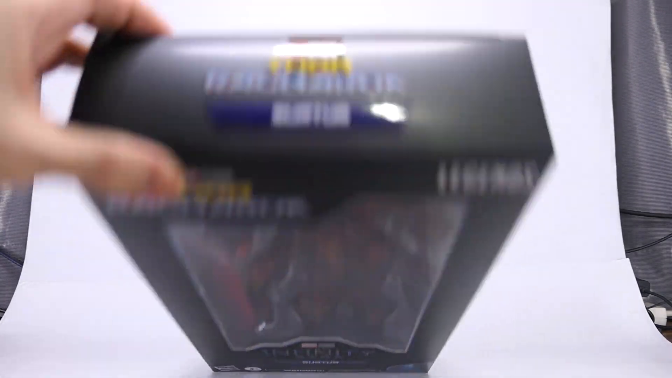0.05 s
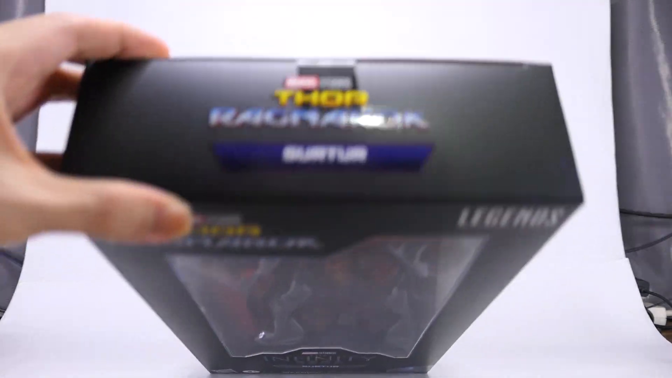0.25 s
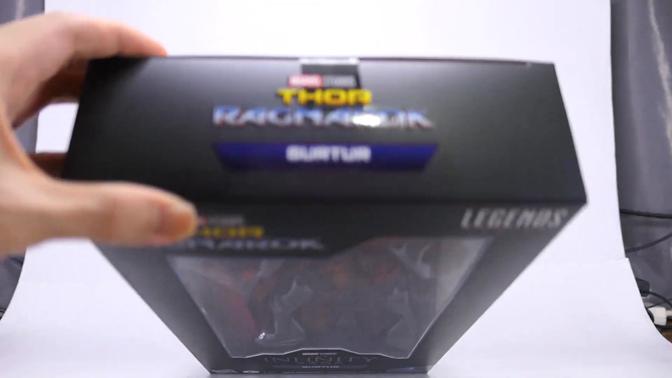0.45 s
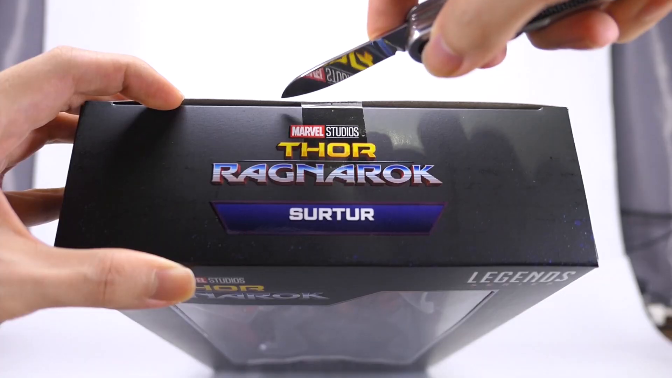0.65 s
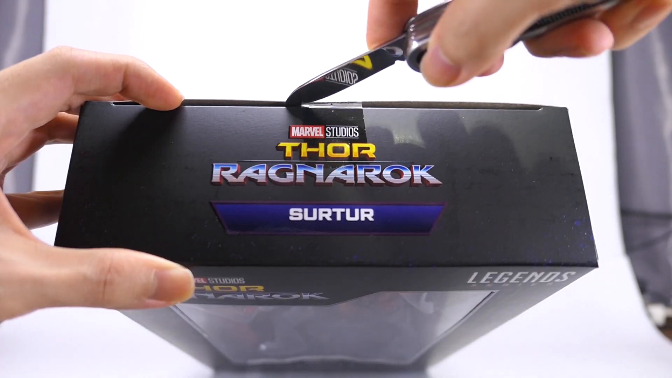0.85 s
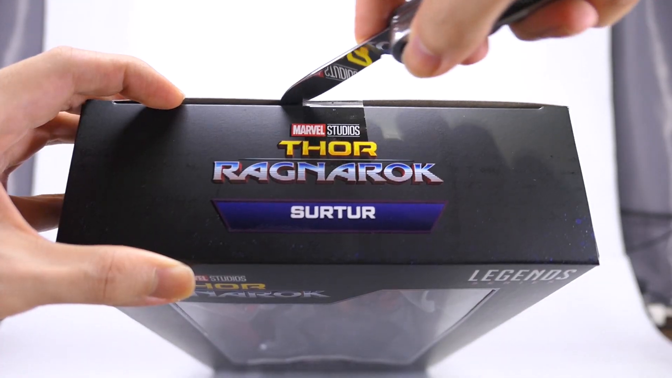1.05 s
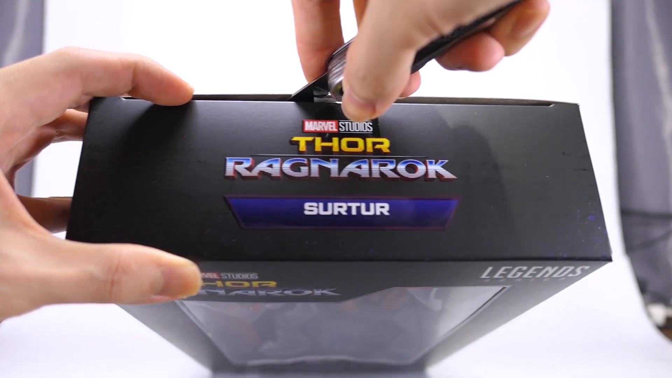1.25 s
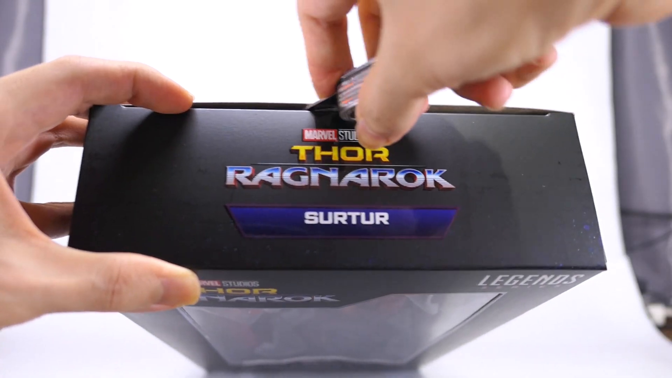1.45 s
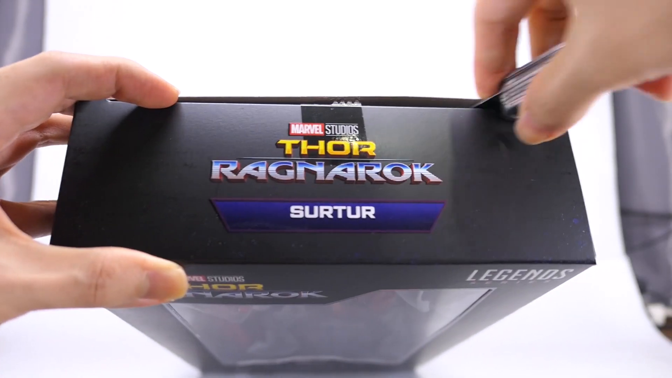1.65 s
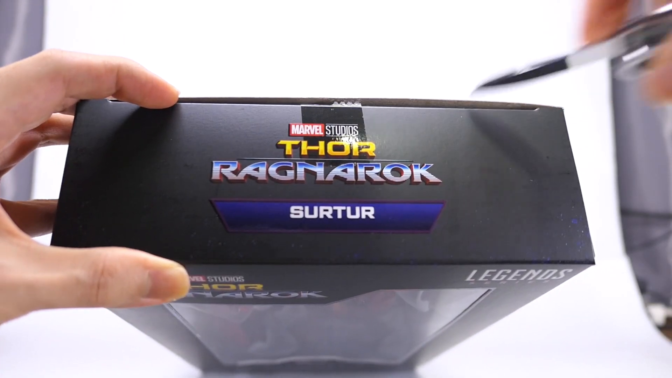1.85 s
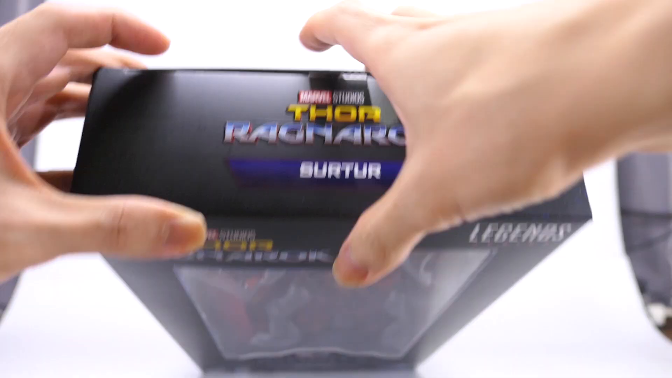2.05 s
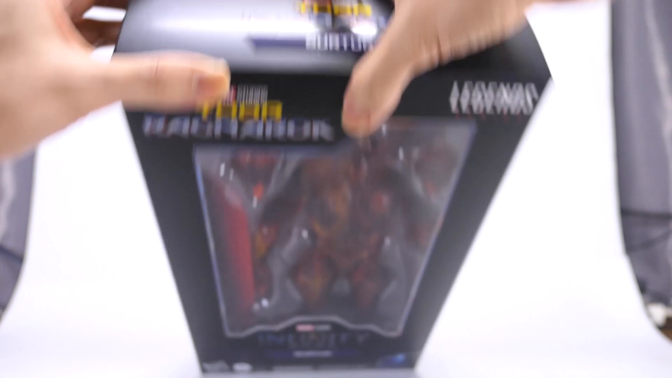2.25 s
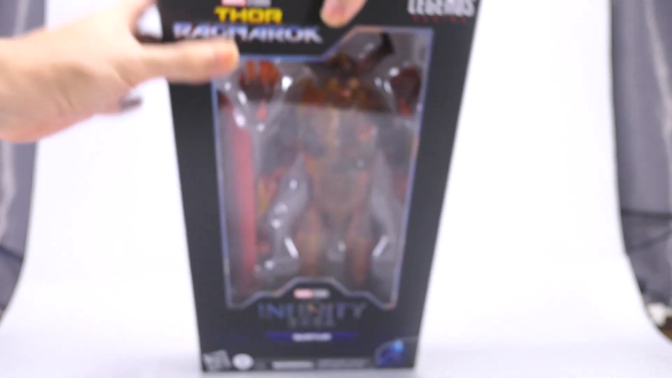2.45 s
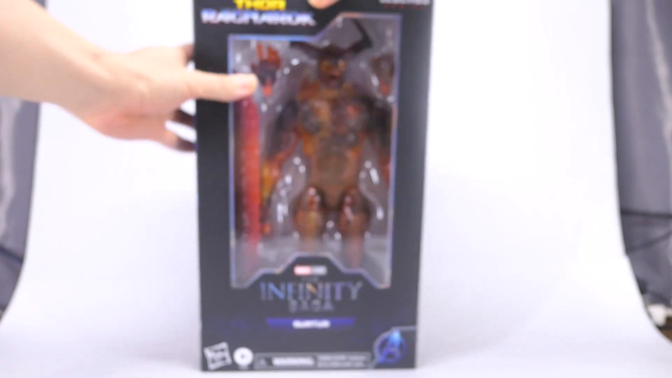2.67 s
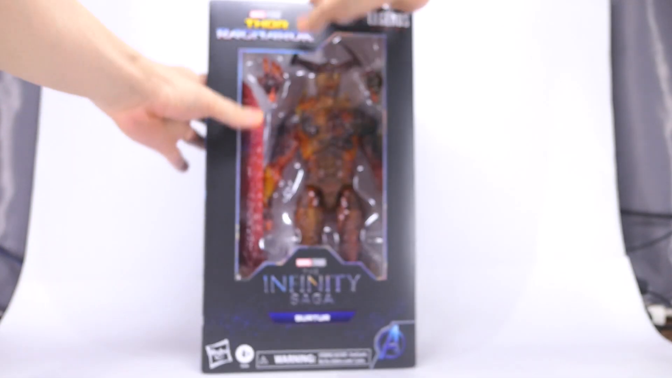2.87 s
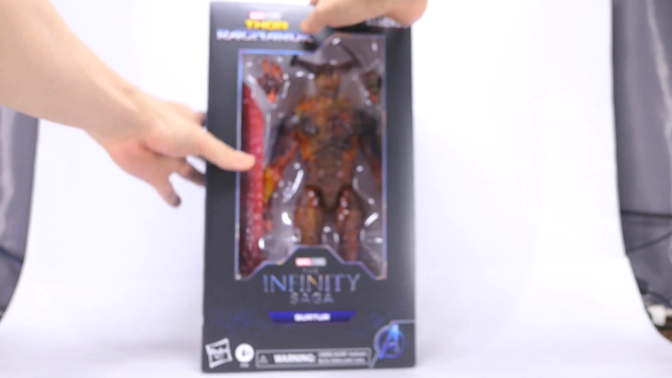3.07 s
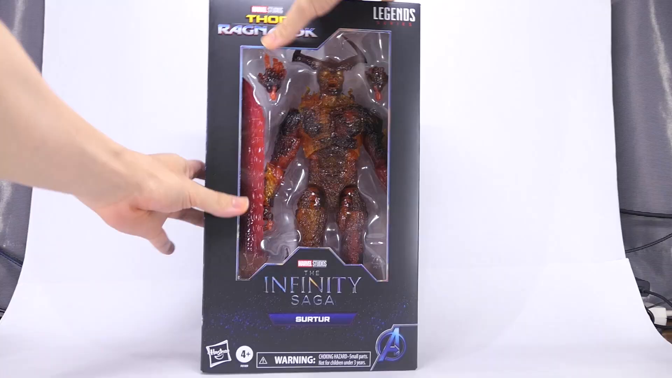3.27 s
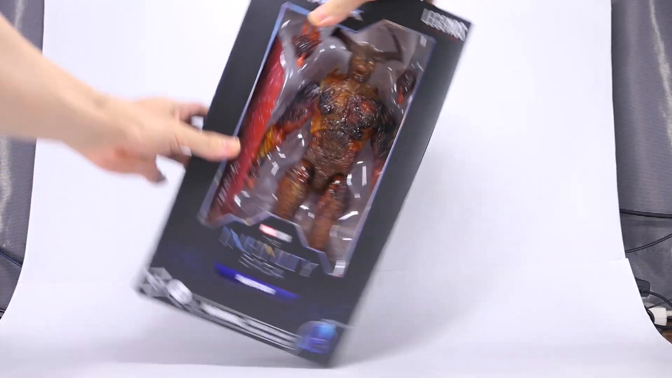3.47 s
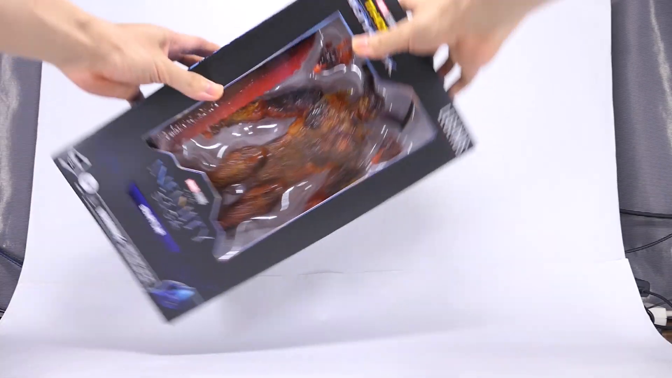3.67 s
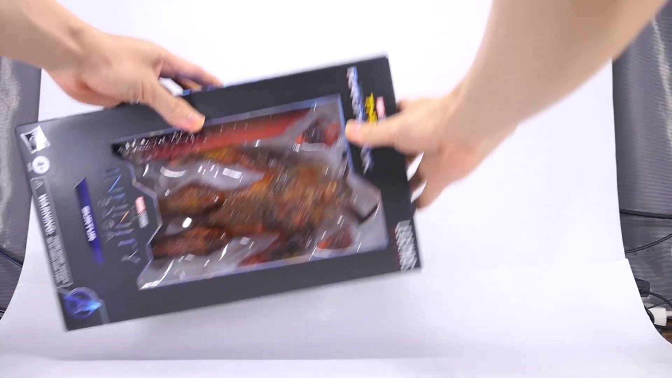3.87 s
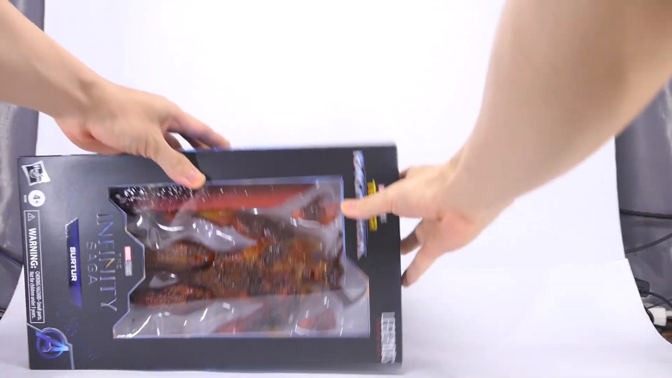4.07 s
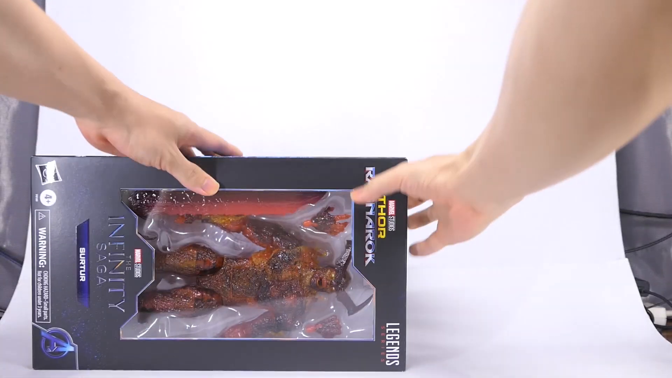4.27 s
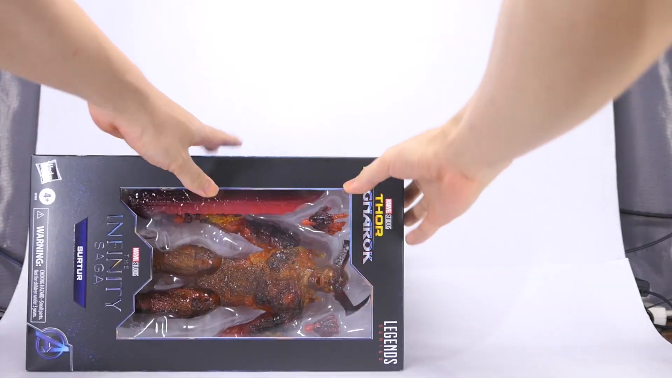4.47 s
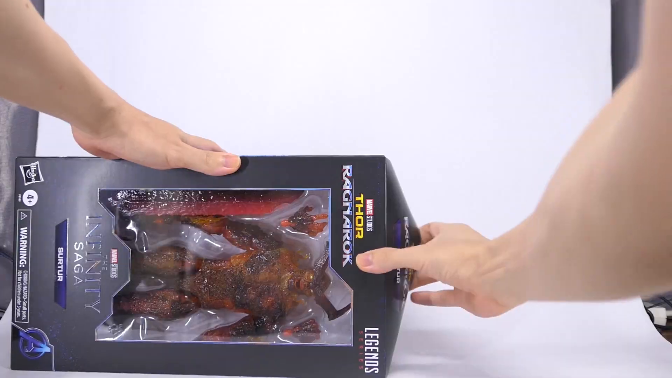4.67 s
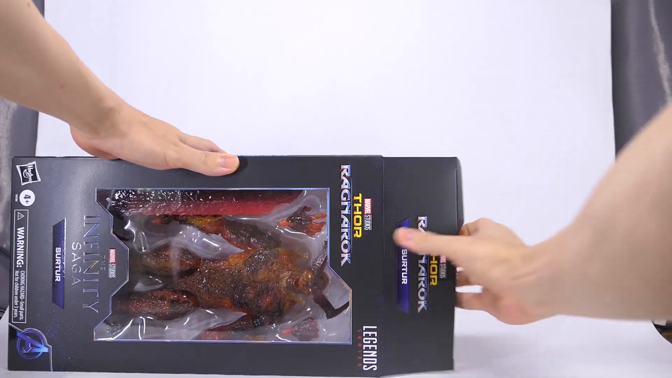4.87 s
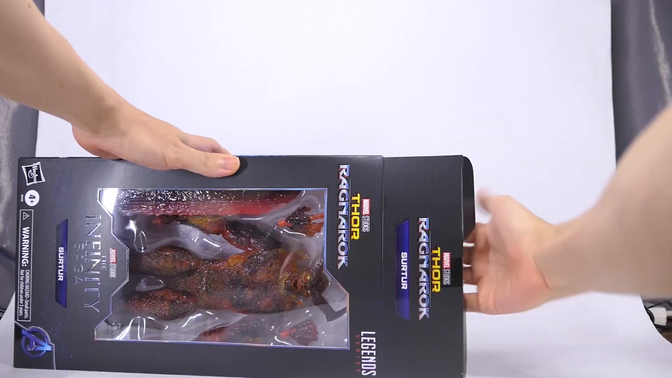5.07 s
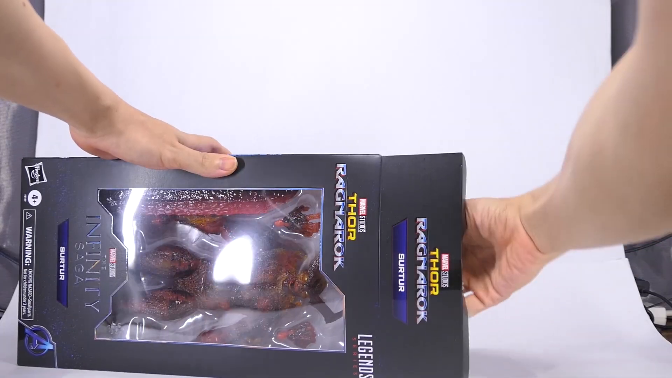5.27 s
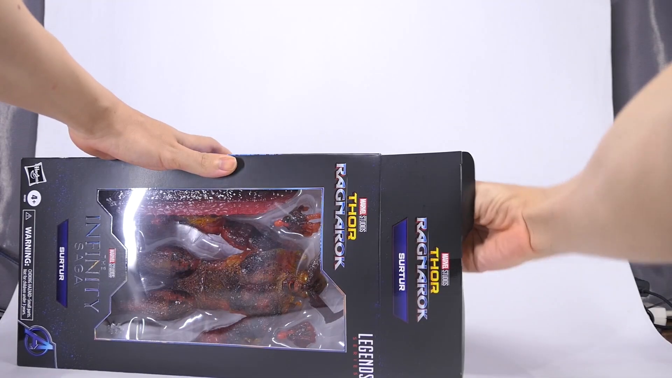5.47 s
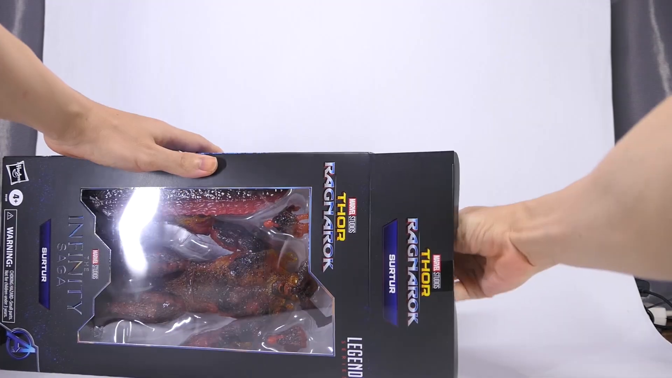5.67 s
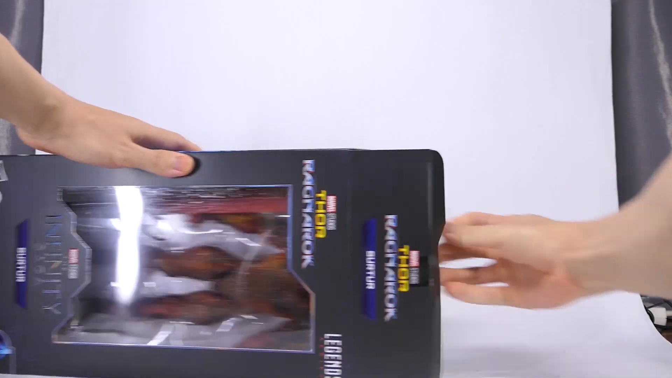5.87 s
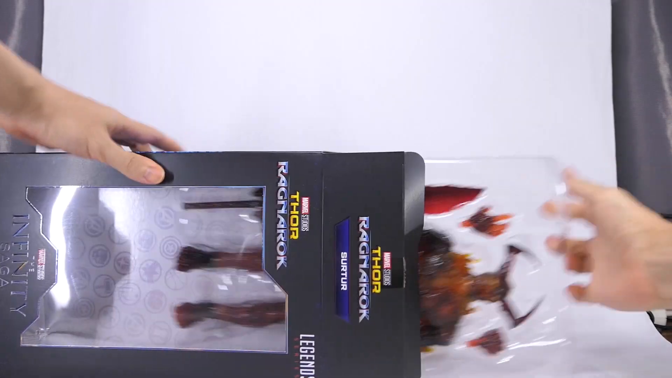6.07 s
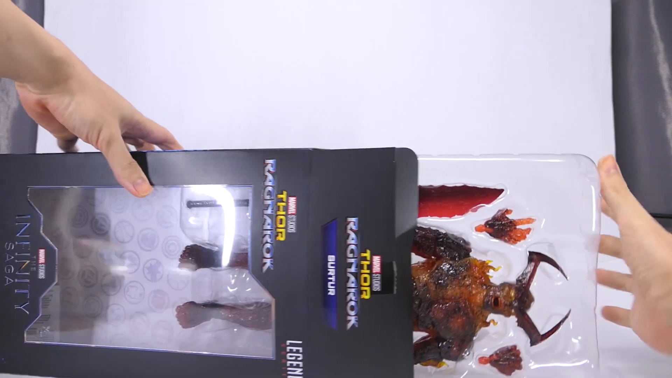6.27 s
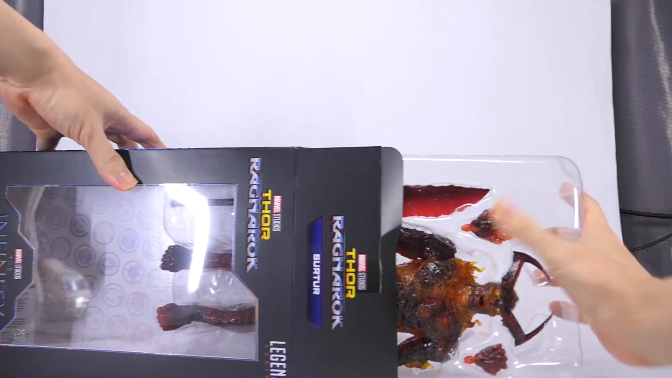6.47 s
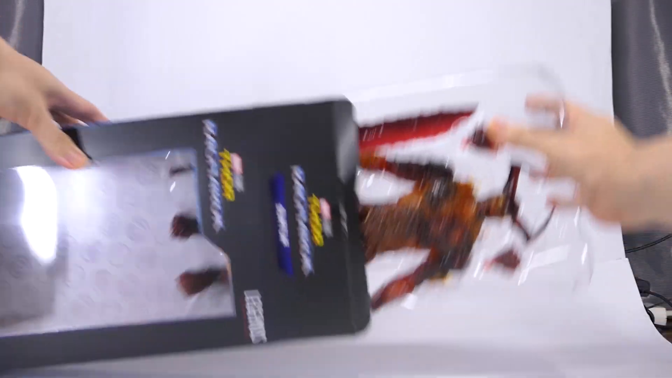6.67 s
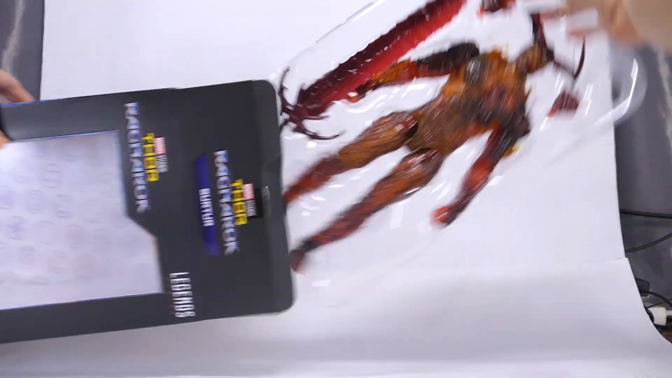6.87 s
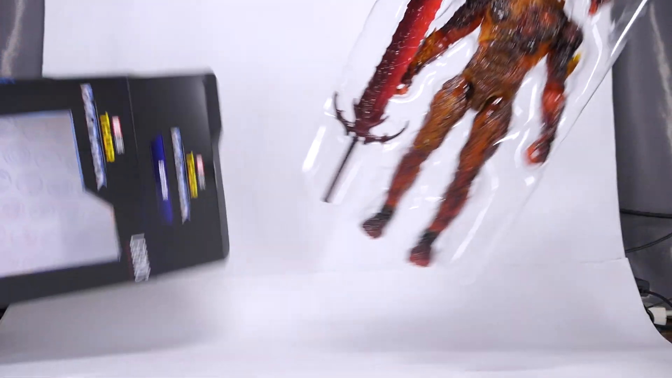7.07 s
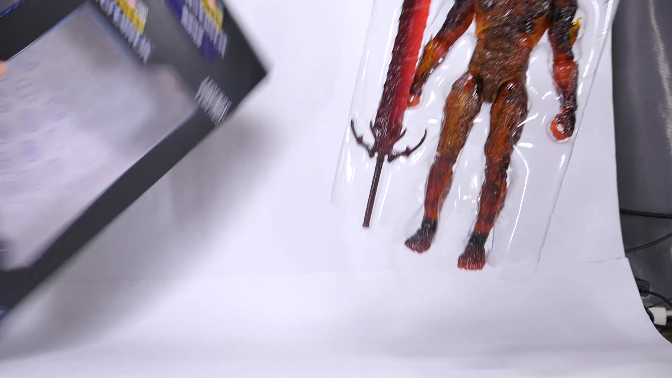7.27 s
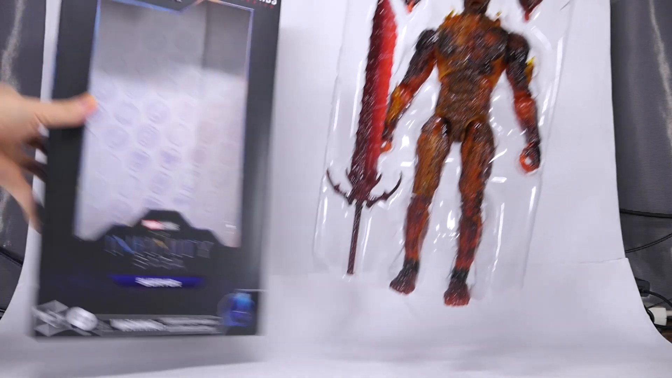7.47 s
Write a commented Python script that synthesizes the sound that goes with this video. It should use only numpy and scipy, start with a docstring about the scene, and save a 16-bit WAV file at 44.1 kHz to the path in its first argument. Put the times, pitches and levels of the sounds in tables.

```python
"""On a table in a quiet room, hands open a cardboard box close to a stereo camera microphone:
a knife cuts the tape, the box is tipped and laid down, the flap opens and a thin plastic tray slides out,
popping and crackling. Each contact is a burst of tiny slips that rings the hollow box, its panels and the
stiff plastic; the blade's grit rings a few narrow bands. A short room tail and a faint hush lie behind."""
import sys
import numpy as np
from scipy import signal
from scipy.fft import rfft, irfft
from scipy.io import wavfile
from scipy.ndimage import uniform_filter1d

SR = 44100
rng = np.random.default_rng(int(sys.argv[2]) if len(sys.argv) > 2 else 0)


def dump_mix(stems):
    """Bounce the given channels to the path in sys.argv[1] as a 16-bit WAV at rate SR."""
    frames = np.atleast_2d(stems).T  # one column per channel
    limited = np.clip(frames, -1, 1)  # hard clip at full scale
    pcm = np.round(limited * 32767).astype(np.int16)
    wavfile.write(sys.argv[1], SR, pcm)


N = 331808  # length in samples

# Knocks and pops. Each row: main blow in seconds, hollow thump in dB, panel knock in dB, crack in dB,
# treble over crack in dB, favoured hollow, panel and crack pitches in Hz, fall in ms.
HITS = [(0.072, -42.5, -51, -69, -5, 298, 910, 1770, 4.4),
        (0.1182, -57, -44.5, -47, -34, 280, 860, 2150, 3),
        (0.1328, -60, -42, -48, -31, 260, 800, 1400, 3.9),
        (0.2462, -46.6, -44, -50, -28, 323, 655, 1490, 3.4),
        (0.7348, -51.5, -59, -60, -13, 262, 970, 1880, 4.7),
        (0.8994, -51, -49.9, -58, -10, 330, 635, 2040, 4.9),
        (1.224, -33, -44, -45, -1.8, 360, 600, 2330, 3.6),
        (1.403, -30.5, -41, -40.5, -1.5, 309, 690, 1890, 4.8),
        (1.4174, -25, -34.5, -43, -11, 326, 794, 1770, 3.2),
        (1.4933, -32.5, -58, -62, -8, 298, 590, 2160, 2.9),
        (1.5731, -23.4, -37, -54, 11, 325, 640, 1620, 3), (1.5918, -29, -42, -47, 8, 284, 740, 2210, 4.7),
        (1.6017, -30, -39, -36.7, -9, 315, 940, 2210, 4.2),
        (2.3937, -34, -44.5, -54, -6, 304, 940, 1330, 3.7),
        (2.4774, -46, -59.8, -57, 0, 300, 740, 1680, 4.0),
        (2.5085, -41, -52, -59, -9.4, 340, 930, 1810, 4.2),
        (2.6068, -43, -48.5, -53, -21, 344, 1020, 1660, 3.4),
        (2.7359, -52, -48.8, -52, -10, 320, 637, 1760, 5.3),
        (2.7744, -46.6, -44, -62, -10.7, 350, 775, 1440, 4.3),
        (2.8467, -45, -52, -43, -29, 320, 680, 1920, 4.8),
        (2.8541, -39.8, -49, -49, 3, 322, 560, 1890, 5.7),
        (2.9185, -40, -46, -44, -21, 350, 590, 1300, 3.8),
        (2.9356, -36, -27.5, -35.5, 10, 325, 560, 1560, 2.37),
        (3.0194, -43, -40.5, -56, -13, 330, 550, 1390, 4.8),
        (3.3471, -37, -34.5, -53, -5, 360, 550, 1610, 3.2),
        (3.3638, -28, -25, -35.5, -11, 334, 630, 1610, 3.1),
        (3.4037, -36, -36, -44, -9, 316, 590, 1590, 4.8),
        (3.4563, -29.5, -36, -51, -3, 283, 530, 1310, 5.2),
        (3.579, -39.5, -42.5, -57, -9, 380, 567, 1640, 2.83),
        (3.6417, -50, -41.5, -64, -19, 340, 690, 1330, 4.4),
        (3.7842, -44, -35.5, -46, -13, 320, 690, 1360, 5.1),
        (3.8267, -54, -40.5, -50.5, -13, 250, 630, 1620, 4.2),
        (4.0105, -33, -26.5, -37.5, -11, 317, 637, 1630, 2.93),
        (4.1165, -25.7, -15.5, -34, -16, 335, 638, 1330, 4.43),
        (4.1245, -25, -23, -36, -5, 310, 686, 1810, 2.9),
        (4.2041, -17.7, -24.5, -25, -9.5, 352, 640, 1490, 3.94),
        (4.2247, -25, -32, -50.4, 1, 330, 540, 1560, 3.4),
        (4.2844, -39.6, -37, -39, -21, 322, 606, 1930, 3.7),
        (4.356, -44, -43.5, -63, -16.8, 293, 570, 1750, 4.0),
        (4.3766, -38.5, -37.5, -49, -30, 307, 690, 1900, 3.6),
        (4.4886, -42, -42, -55, 0, 260, 774, 1300, 2.5), (4.579, -45.4, -38, -57, -2, 308, 530, 1860, 3.4),
        (4.606, -40.5, -43.0, -58.3, -4, 340, 560, 1570, 4.5),
        (4.718, -15, -20, -33.5, -7, 317, 540, 1630, 4.5),
        (4.7403, -40, -26, -22.5, -30, 288, 550, 1660, 3.5),
        (4.8662, -12.5, -17.5, -15, -22, 297, 655, 2120, 6.5),
        (4.9053, -32.5, -38.9, -38.5, -8.5, 290, 600, 1690, 3.9),
        (5.1169, -29, -24.5, -30, -12, 287, 530, 1740, 2.65),
        (5.1686, -35, -32, -34, -12, 288, 800, 1700, 3.5),
        (5.2315, -49, -31, -28.5, -16, 320, 690, 2330, 3.9),
        (5.2526, -24.5, -26.5, -36, -23, 320, 736, 1900, 4.0),
        (5.3291, -41, -32.5, -41, -12.8, 250, 620, 2100, 6.6),
        (5.6375, -27.1, -23.5, -24.5, -16, 292, 640, 1740, 5.7),
        (5.7005, -31.5, -40, -52, -10.7, 267, 600, 1720, 3.5),
        (5.754, -25.5, -17.4, -14.5, -21, 336, 710, 1520, 4.38),
        (5.8352, -25, -13, -12, -6.5, 336, 866, 1660, 1.84),
        (5.9121, -25, -29.5, -32.5, -13, 263, 666, 1620, 2.64),
        (5.9831, -29.4, -17, -15, -3, 290, 745, 1670, 2.84),
        (6.0356, -48, -26.5, -23, -32, 330, 820, 1700, 4.0),
        (6.0752, -21.5, -23.5, -23, -32, 350, 570, 1410, 3.7),
        (6.1, -34, -25, -28, -9.4, 300, 1000, 1570, 3.4), (6.1179, -37, -29, -33, -33, 280, 784, 1640, 4.6),
        (6.1423, -27.5, -20, -24.5, -11.5, 350, 920, 1550, 4.3),
        (6.1683, -27, -13, -13, -16.5, 290, 1120, 1600, 3.3),
        (6.2453, -40, -41, -40.7, -30, 360, 1110, 1800, 5),
        (6.3043, -56, -46.3, -43, -10, 300, 1050, 1760, 4.4),
        (6.3969, -50, -37.8, -36, -11.5, 360, 930, 2290, 4.9),
        (6.4221, -44.2, -36.5, -52, -8.8, 280, 920, 1340, 6.7),
        (6.5096, -42.4, -37.2, -37, -10, 330, 920, 1420, 3.2),
        (6.5904, -35, -27, -33, 16, 250, 970, 2310, 2.95),
        (6.6314, -35.8, -39, -31.5, 6.5, 328, 775, 1810, 3.9),
        (6.644, -32, -33, -22.1, -3, 293, 1020, 1740, 4.1),
        (6.7074, -41, -35, -37.5, -10, 302, 960, 1610, 4.6),
        (6.7664, -33.3, -31, -39.5, 1, 271, 655, 1730, 2.8),
        (6.8696, -32, -29, -28, -29, 230, 640, 1430, 3.4),
        (6.9155, -27.5, -29, -30.5, 4.5, 278, 570, 2170, 4.2),
        (6.9681, -21, -22.9, -21, -18, 283, 1050, 1830, 5.3),
        (6.9944, -23, -34, -28, -2.5, 360, 640, 1390, 3.6),
        (7.0373, -26.5, -21, -23.5, -11.8, 300, 1170, 1440, 6.4),
        (7.1115, -31, -35.5, -44.2, -14.2, 296, 735, 1380, 4.0),
        (7.1794, -35, -32.5, -37.8, -19, 334, 620, 2320, 3.3),
        (7.1899, -35, -50, -39, 5, 350, 500, 2100, 2.3),
        (7.2454, -60, -48, -42.5, -16, 310, 970, 2240, 3.9),
        (7.2925, -47, -44.5, -48, -1, 285, 670, 1840, 4.3),
        (7.3536, -39, -35.5, -44.5, -24, 287, 1100, 1560, 2.7),
        (7.4089, -51, -40, -44.4, -4, 277, 795, 1600, 3.7),
        (7.4558, -56, -43.5, -49, -6, 280, 930, 1830, 5.7),
        (7.4734, -40.5, -46, -56, -4, 260, 540, 1577, 5)]
# Small bright ticks of nail, blade and film. Each row: main blow in seconds, level in dB.
TICKS = [(0.3162, -54), (0.3605, -53), (0.5696, -48), (1.509, -39.5), (1.9265, -37), (1.9587, -44),
         (2.2677, -43), (2.3229, -34), (2.3413, -37.5), (2.8442, -33.5), (3.926, -46), (6.5404, -45),
         (7.013, -20), (7.3841, -44), (7.424, -34.5)]
# Colour of a tick. Each entry: level of one register against the tick's level in dB.
TICK_COLOUR_DB = (-24, -24, -22, -31, -9)
# Scrapes of blade, flap and tray. Each row: start in seconds, rise, hold and fall in ms (kept to 1-95 ms),
# hollow, panel and rasp levels in dB, treble over rasp in dB.
SCRAPES = [(0.19, 11, 56, 26, -71, -55.5, -55.5, -10.5), (1.141, 69, 45, 88, -42.5, -47.5, -45, -5.5),
           (1.562, 3.4, 44, 21, -32, -44, -48, 5.5), (1.614, 3.4, 70, 62, -54, -57, -48.5, 5),
           (1.84, 29, 68, 10, -65, -61, -52.5, -5), (2.899, 10, 46, 75, -39, -41.5, -51.5, -6),
           (3.359, 5, 22, 15, -58, -39, -40.5, -9.5), (3.41, 9.1, 48, 71, -39.5, -42.5, -49, 0),
           (3.491, 7.5, 75, 8, -67, -58, -60.5, 3), (4.189, 7, 4.3, 19.6, -24.5, -19.5, -31.5, -8),
           (4.66, 78, 5.6, 46, -31.5, -37.5, -35.5, -7.5), (4.801, 38, 27, 15, -33.5, -40, -43.5, -20),
           (4.989, 12.5, 50, 27, -45.5, -46.5, -47.5, -13), (5.13, 7.1, 66, 15, -39.5, -40, -40, -13),
           (5.199, 20, 37, 44, -43, -39.5, -36.5, -16), (5.31, 6.7, 6.8, 14, -39, -42.5, -46, -16),
           (5.36, 89, 18, 13, -38.5, -35.5, -36.5, -14), (5.42, 34, 49.4, 22, -37, -40, -37.5, -10.5),
           (5.574, 21.6, 24, 12, -40, -43, -42, -13), (5.645, 3, 20, 19, -44, -40, -43, -10.5),
           (5.719, 33, 5.7, 3.8, -26.5, -27, -34.5, -23), (5.92, 30, 40, 11, -41, -43, -39, -28),
           (6.05, 22, 110, 59, -37, -29, -35, -26), (6.165, 3.7, 6.6, 22, -37, -26, -31, -20),
           (6.258, 6.7, 7.6, 14, -63, -37.5, -42.5, -26), (6.47, 39, 20, 17, -50, -42, -43.5, -18),
           (6.595, 6, 51, 13, -38.5, -31, -34.5, -4.5), (6.7, 2.8, 15, 22, -61, -36, -49, -15),
           (6.74, 24, 75, 21, -55, -36.5, -47.5, 0), (6.86, 2.8, 41, 10, -38, -33, -38.5, -10),
           (6.912, 1.8, 42, 10, -37, -26.5, -29.5, -0.5), (6.967, 1.4, 33, 26, -28, -26, -31, -10.5),
           (7.022, 2.4, 8, 75, -23.5, -26.5, -30, -5)]
# Knife cuts through the tape. Each row: start in seconds, length in seconds, level in dB.
CUTS = [(1.155, 0.17, -45), (1.602, 0.14, -47), (1.81, 0.084, -56)]
# Resonances of blade and taut tape. Each row: pitch in Hz, width in Hz, relative level in dB.
BLADE_BANDS = [(2530, 220, 0), (3570, 200, 2), (4900, 250, -5)]
# Hands shifting on the card all along. Each row: time in seconds, level in dB, brightness in dB per register.
RUB = [(0.0, -55.5, -3), (1.0, -61.5, -2.5), (1.51, -47.5, -2.5), (2.22, -58.5, -3), (2.81, -52.5, -2.5),
       (3.35, -62.5, -5), (3.5, -52.5, -5), (3.87, -55, -6), (4.23, -42.5, -1), (4.4, -53.5, -2.5),
       (4.61, -56, -2), (4.75, -46.5, -3), (5.15, -48.5, -3.5), (5.25, -45.5, -4), (5.74, -47, -3.5),
       (6.05, -39, -1.5), (6.33, -46, -2.5), (6.53, -47, -0.5), (6.83, -42.5, -2), (6.97, -36.5, -0.5),
       (7.18, -50, -5.5), (7.52, -55.5, -3.5)]
# Colour of the rubbing. Each entry: level of one register against the rubbing's level in dB.
RUB_COLOUR_DB = (0, 0, 0, 0.5, -0.5)
# Modes of box and tray, one list per register. Each row: pitch in Hz, relative level in dB, t60 in seconds.
MODES = [
    [(122, -4, 0.055), (209, -28, 0.064), (267.2, 3.5, 0.071), (301.5, -1.5, 0.13), (343.7, 10.5, 0.086),
     (402, -5.5, 0.04)],
    [(487, -32, 0.048), (560.5, 11, 0.055), (648, -0.5, 0.054), (742, 8, 0.044), (873, 10, 0.012),
     (1020, -5.5, 0.038), (1225, -2, 0.048)],
    [(1318, 11, 0.035), (1636, -2.5, 0.047), (1852, 6, 0.021), (2284, 0, 0.046)],
    [(2724, 0.5, 0.04), (3370, -2, 0.039), (3900, 5.5, 0.013)],
    [(7360, -4, 0.011), (9660, 1, 0.0026)],
]
# The five registers. Each row: low edge in Hz, high edge in Hz, broad crack over modes in dB for hits,
# the same for rubbing and scraping, t60 of the small dense modes in seconds, low-pass tilt from 0 to 1.
REGISTERS = [(170, 500, -14.5, -2.5, 0.056, 0.8), (408, 1154, -6, -2, 0.046, 0),
             (1267, 2860, 1.5, 8.5, 0.032, 0.45), (2590, 5610, 4.5, 20.5, 0.041, 0.59),
             (5250, 13700, 1.5, 12, 0.088, 1)]
# Length of the ring. Each entry: samples for one register.
RING_SAMPLES = (3072, 2048, 1280, 1024, 768)
# Where the hands work. Each row: time in seconds, left minus right in dB.
HANDS = [(0., -3.5), (1.2, -0.5), (2.6, -2), (4.3, 1), (5.6, -0.2), (6.2, -1.5), (7.5, 0.9)]
# Spectrum of the room hush and hiss. Each row: frequency in Hz, relative level in dB.
AIR_SPECTRUM = [(15, -44), (25, -15.5), (95, 2.5), (252, 5), (483, -5.5), (669, -6), (902, -4),
                (1880, -12.5), (2090, -15.5), (2600, -13.5), (3700, -28.5), (5570, -21.5), (9850, -27.5),
                (14800, -32.5), (16500, -60)]
# Likeness of the hush at the two sides. Each row: frequency in Hz, left-right likeness from 0 to 1.
AIR_LIKENESS = [(30, 0.44), (120, 0.093), (1000, 0.09), (6000, 0.93), (14000, 0.54)]

FAVOUR_DB = 60  # loss per octave away from the favoured pitch
SNAP_SHARE, SNAP_DB = 0.39, 0.72  # the snap register lies between crack and treble
ONSET_SHARE = .5  # softness of the onset, as a share of the fall time
TICK_FALL_MS = 3.3
NEAR_DB, NEAR_T60_S = -12, 0.012  # first echoes of the surroundings
# very short random treble difference between left and right, new for each contact, one octave up from its Hz
SIDE_TREBLE_DB, SIDE_TREBLE_HZ = -11, 11400
LOW_CUT_HZ = 85
ROOM_DB, ROOM_T60_S, ROOM_TOP_HZ = -24.5, 0.19, 5300
AIR_DB = -51.5  # before a slow random waver
BLOCK = 4096  # samples, base length of sounds and tail
CEILING, TOP_HZ = .97, 15900  # peak rounding limit before the treble cut, and the cut


def hits():
    """Modal selection: knocks on box, flap and tray excite most the modes near their own pitches."""
    s, *levels_db, hollow_hz, panel_hz, crack_hz, fall_ms = np.transpose(HITS)
    return blows(s, registers(*levels_db), (hollow_hz, panel_hz, crack_hz), fall_ms)


def ticks():
    """Light impact: a touch of nail, blade or film rings little but the treble."""
    s, level_db = np.transpose(TICKS)
    part_db = [level_db + colour for colour in TICK_COLOUR_DB]
    return blows(s, part_db, (), np.full(len(s), TICK_FALL_MS))


def blows(s, part_db, favoured_hz, fall_ms):
    """Impact excitation: a burst of slips with a softened onset around one main blow, in all registers."""
    ms = np.arange(BLOCK // 3) * 1000 / SR
    fall = np.clip(fall_ms, .3, 12)[:, None]
    onset = ONSET_SHARE * fall
    envelope = np.where(ms < onset, (ms / onset) ** 2, np.exp(-(ms - onset) / fall))
    burst = slips((len(s), len(ms)), share=.06, spread_db=1.97) * envelope
    # the main blow, one click at the peak of the envelope
    burst += 2.61 * np.clip(1 - np.abs(ms - onset) * SR / 1000, 0, 1)
    sound = np.zeros((len(s), BLOCK + len(ms)))
    # registers above the given pitches favour none
    for k, (db, hz) in enumerate(zip(part_db, favoured_hz + (None,) * 5)):
        ring = response(k, count=len(s), scatter_db=1.0, rubbed=False, favoured_hz=hz)
        ring = signal.fftconvolve(burst, ring, axes=1)
        power = uniform_filter1d(ring[:, :BLOCK // 2] ** 2, size=256, axis=1)
        loudest = np.sqrt(power.max(axis=1))
        sound[:, :ring.shape[1]] += ring * (undb(db) / loudest)[:, None]
    return place(s - onset[:, 0] / 1000, sound)


def registers(hollow_db, panel_db, crack_db, treble_db):
    """Spectral division: a contact's levels in the five registers, the snap set from crack and treble."""
    snap_db = crack_db + SNAP_DB + SNAP_SHARE * treble_db
    return hollow_db, panel_db, crack_db, snap_db, crack_db + treble_db


def scrapes():
    """Stick-slip friction: dense grit under a swelling and easing pressure that catches unevenly."""
    s, rise_ms, hold_ms, fall_ms, *levels_db = np.transpose(SCRAPES)
    ms = np.arange(3 * BLOCK) * 1000 / SR
    rise, hold, fall = (np.clip(v, 1, 95)[:, None] for v in (rise_ms, hold_ms, fall_ms))
    pressure = np.clip(np.minimum(ms / rise, 1 + (rise + hold - ms) / fall), 0, 1)
    # sample numbers in the scene that lie under each scrape
    under = (s * SR).astype(int)[:, None] + np.arange(len(ms))
    grit = unit(slips((len(s), len(ms)), share=.07, spread_db=2.26)) * undb(3.2 * walk(110)[under])
    sound = np.zeros((len(s), 4 * BLOCK))
    for k, db in enumerate(registers(*levels_db)):
        ring = response(k, count=len(s), scatter_db=2.0, rubbed=True)
        # the treble needs more pressure: it comes later and leaves sooner
        drive = grit * pressure ** (0.67 + 0.15 * k) * undb(1.3 * walk(130)[under])
        ring = signal.fftconvolve(drive, ring, axes=1)
        sound[:, :ring.shape[1]] += ring * undb(db)[:, None]
    return place(s, sound)


def blade():
    """Resonant filtering: coarse tearing grit rings a few resonances of blade and taut tape."""
    t = np.arange(N) / SR
    grit = slips(N, share=0.035, spread_db=2.8) * undb(1.4 * walk(90))
    ring = 0
    for hz, width, db in BLADE_BANDS:
        ring = ring + undb(db) * unit(band(grit, hz - 1.2 * width, hz + 1.5 * width))
    swell = 0
    for start, length, db in CUTS:
        swell = swell + undb(db) * np.sin(np.pi * np.clip((t - start) / length, 0, 1))
    return unit(ring) * swell


def rubbing():
    """Distributed friction: faint, uneven slips of several fingers, each touching at its own place."""
    s, level_db, bright_db = np.transpose(RUB)
    t = np.arange(N) / SR
    grip_db = 2.9 * walk(27) - 3.0
    grit = slips((3, N), share=.08, spread_db=2.06)
    out = 0
    for k, colour_db in enumerate(RUB_COLOUR_DB):
        db = level_db + colour_db + bright_db * (k - 1)
        ring = response(k, count=3, scatter_db=1.5, rubbed=True)
        rub = signal.oaconvolve(grit, ring, axes=1)[:, :N]
        # one contact in the middle; the two hands touch to either side of it
        pair = rub[0] + np.array([[1.86, 0.077], [0.08, 1.6]]) @ rub[1:]
        out = out + unit(pair) * undb(np.interp(t, s, db) + grip_db + 0.88 * walk(6.7))
    return out


def slips(shape, share, spread_db):
    """Stick-slip release: sparse clicks of either sign, a few much larger than the rest."""
    when, size = rng.random(shape), rng.exponential(size=shape)
    out = np.zeros(shape)
    slip = when < share
    sign = np.sign(when[slip] - share / 2)
    out[slip] = sign * undb(np.minimum(spread_db * size[slip], 15))
    return out


def response(k, count, scatter_db, rubbed, favoured_hz=None):
    """Modal superposition: ring of register k, energy 1; each contact point weights and detunes the modes."""
    lo_hz, hi_hz, hit_db, rub_db, dense_t60, tilt = REGISTERS[k]
    t = np.arange(RING_SAMPLES[k], dtype=np.float32) / np.float32(SR)
    modes = 0
    for hz, db, t60 in MODES[k]:
        tune, weight = rng.standard_normal((count, 2), dtype=np.float32).T[:, :, None]
        if favoured_hz is not None:
            db = db - FAVOUR_DB * np.abs(np.log2(hz / favoured_hz))[:, None]
        ring = np.sin(np.float32(2 * np.pi * hz) * (1 + np.float32(.04) * tune) * t) * decay(t, t60)
        modes = modes + undb(db + scatter_db * weight) * ring
    # the direct crack of the contact, then a crowd of small modes
    broad = unit(rng.standard_normal((count, len(t))) * decay(t, dense_t60)) / np.sqrt(len(t))
    broad[:, 0] += 1.5 if rubbed else 1.2
    broad = band(signal.lfilter([1], [1, -min(tilt, .95)], broad), lo_hz, hi_hz)
    both = unit(modes) + undb(rub_db if rubbed else hit_db) * unit(broad)
    # each register is kept to its own range, which softens its onset
    return unit(band(both, 0.62 * lo_hz, 1.445 * hi_hz)) / np.sqrt(len(t))


def place(times, sounds):
    """Early reflection: table, hands and camera body return first echoes that differ from left to right."""
    t = np.arange(512) / SR
    near, treble = rng.standard_normal((len(times), 2, len(t))).transpose(1, 0, 2)
    near = unit(band(near * decay(t, NEAR_T60_S), 460, 20700))
    treble = unit(band(treble * np.exp(-t / 0.0011), SIDE_TREBLE_HZ, 2 * SIDE_TREBLE_HZ))
    echoes = (undb(NEAR_DB) * near + undb(SIDE_TREBLE_DB) * treble) / np.sqrt(len(t))
    size = sounds.shape[1]
    pans_db = np.interp(times, *np.transpose(HANDS))
    sides = signal.fftconvolve(sounds, echoes, axes=1)[:, :size]
    out = np.zeros((2, N + size))
    for start, mid, side, pan_db in zip((times * SR).astype(int), sounds, sides, pans_db):
        pair = np.array([mid + side, mid - side])
        out[:, start:start + size] += pair * undb(np.array([[pan_db], [-pan_db]]) / 2)
    return out[:, :N]


def room(dry):
    """Reverberation: the walls answer with a short, dull tail; each side hears its own echoes."""
    t = np.arange(4 * BLOCK) / SR
    tail = band(rng.standard_normal((2, len(t))), 68, ROOM_TOP_HZ)
    tail = tail * decay(t, ROOM_T60_S) * (t > .006)  # nothing returns in the first 6 ms
    tail = undb(ROOM_DB) * unit(tail) / np.sqrt(len(t))
    return signal.fftconvolve(dry.mean(axis=0, keepdims=True), tail, axes=1)[:, :N]


def air():
    """Partial coherence: room hush and microphone hiss, partly alike left and right, wavering a little."""
    log_hz = np.log(np.fft.rfftfreq(N, 1 / SR) + 1)
    colour_hz, colour_db = np.transpose(AIR_SPECTRUM)
    colour = undb(np.interp(log_hz, np.log(colour_hz), colour_db))
    like_hz, likeness = np.transpose(AIR_LIKENESS)
    like = np.clip(np.interp(log_hz, np.log(like_hz), likeness), 0, 1)
    mid, side = rfft(rng.standard_normal((2, N))) * colour * np.sqrt([1 + like, 1 - like])
    hush = unit(irfft(np.array([mid + side, mid - side]), N))
    return hush * undb(AIR_DB + 1.35 * walk(9.9))


def walk(rate):
    """Random modulation: levels held 1 / rate s and slewed; spread near 1."""
    k = int(SR / rate)
    return uniform_filter1d(np.repeat(rng.standard_normal(N // k + 1), k), k)[:N]


def decay(t, t60):
    """Exponential damping: a fall of 60 dB in t60 seconds."""
    return np.exp(-np.log(1000) * t / t60)


def band(x, lo_hz, hi_hz):
    """Band limitation: a gentle Butterworth band-pass."""
    sos = signal.butter(2, [lo_hz, min(hi_hz, .45 * SR)], "band", fs=SR, output="sos")
    return signal.sosfilt(sos, x)


def unit(x):
    """Power normalisation: each row scaled to an rms of 1."""
    return x / np.sqrt(np.mean(x ** 2, axis=-1, keepdims=True))


def undb(db):
    """Logarithmic level: decibels turned into an amplitude factor."""
    return 10 ** (np.asarray(db) / 20)


def scene():
    """Superposition: the contacts add, then the room's answer and the air."""
    close = hits() + ticks() + scrapes() + blade() + rubbing()
    # the close sounds carry no deep bass
    close = signal.sosfilt(signal.butter(3, LOW_CUT_HZ, "high", fs=SR, output="sos"), close)
    return close + room(close) + air()


def record(dry):
    """Saturation and band limit: the recorder rounds the very loudest peaks and cuts the top steeply."""
    rounded = dry / (1 + dry ** 8) ** (1 / 8) * CEILING
    return signal.sosfilt(signal.ellip(8, .2, 70, TOP_HZ, fs=SR, output="sos"), rounded)


dry = scene()
out = record(dry)
dump_mix(out)
```